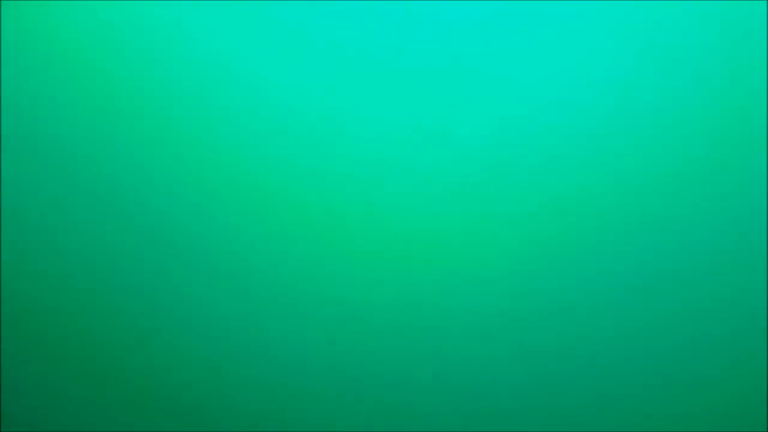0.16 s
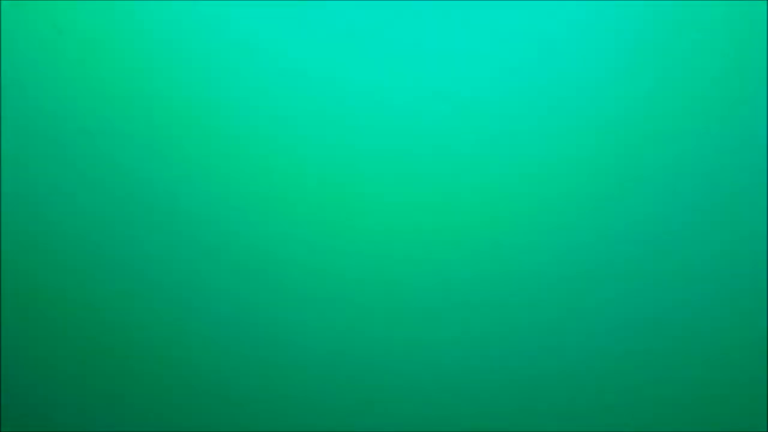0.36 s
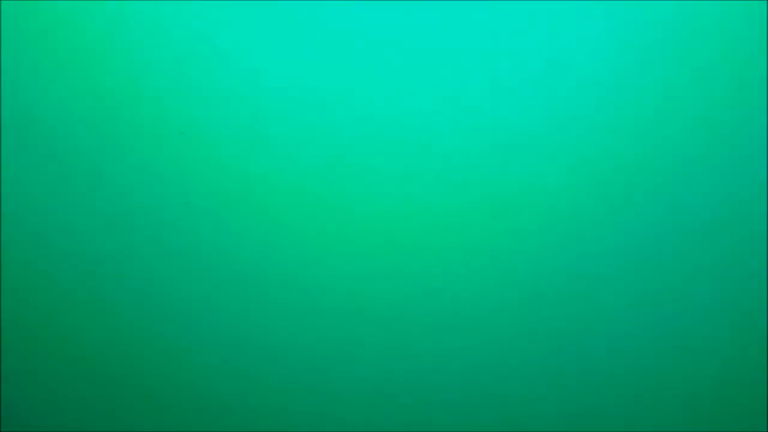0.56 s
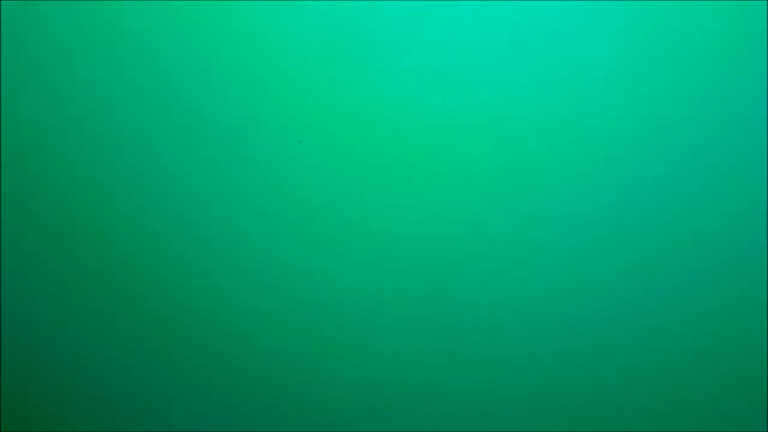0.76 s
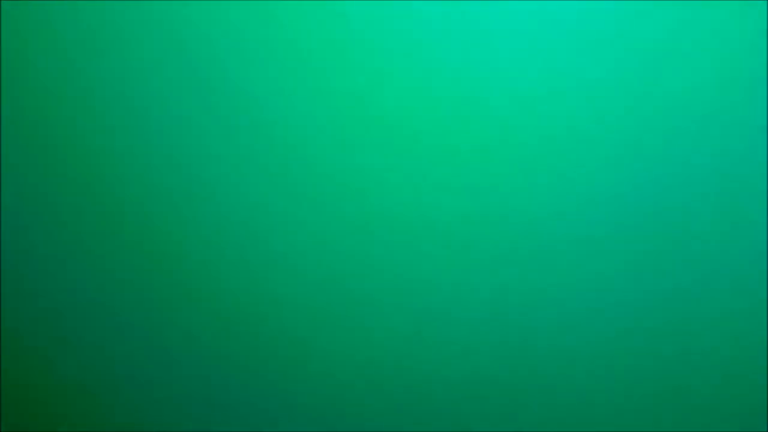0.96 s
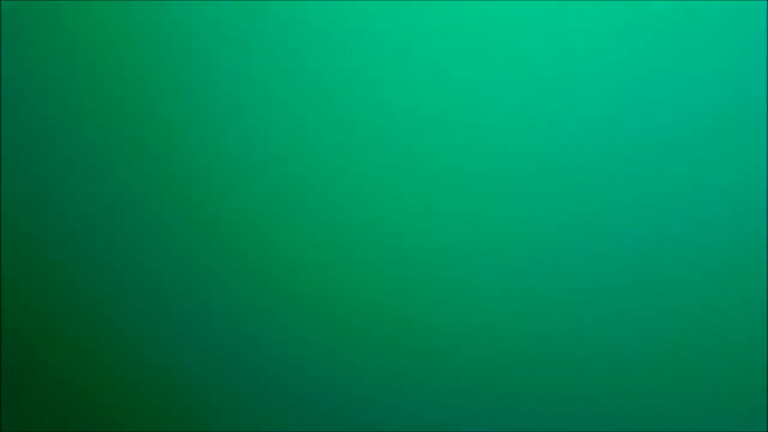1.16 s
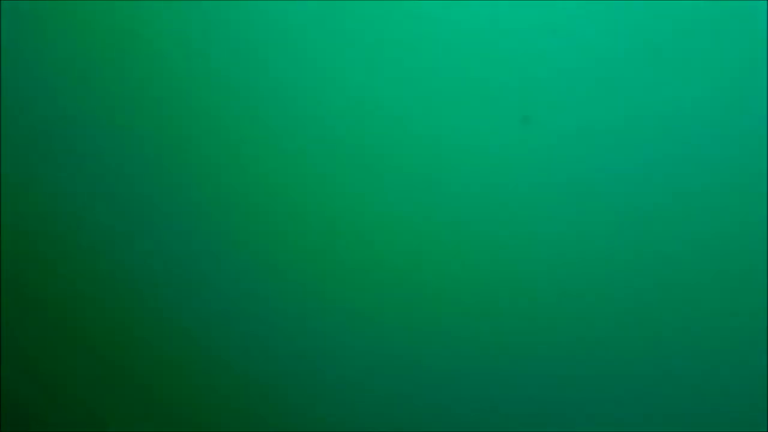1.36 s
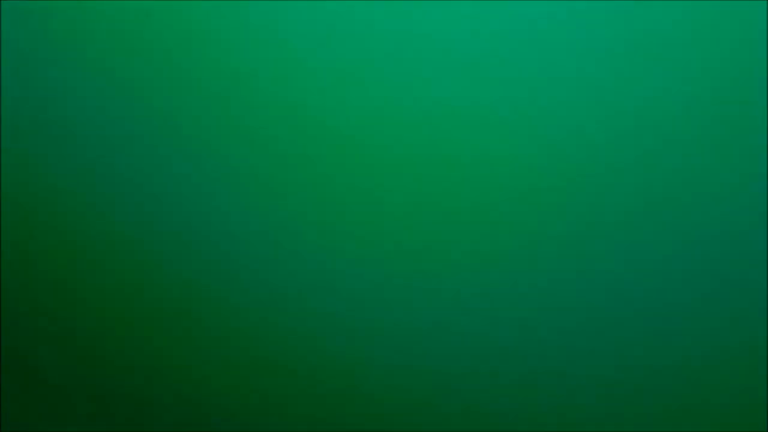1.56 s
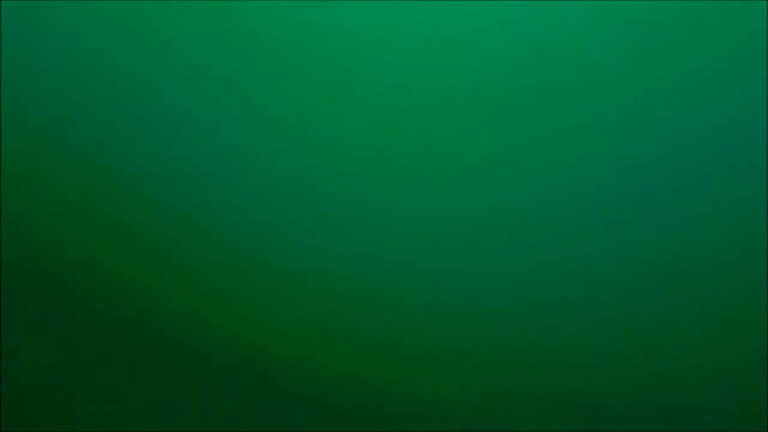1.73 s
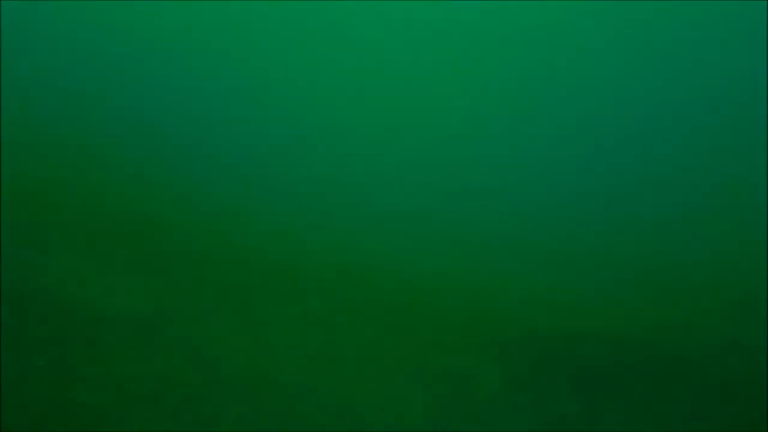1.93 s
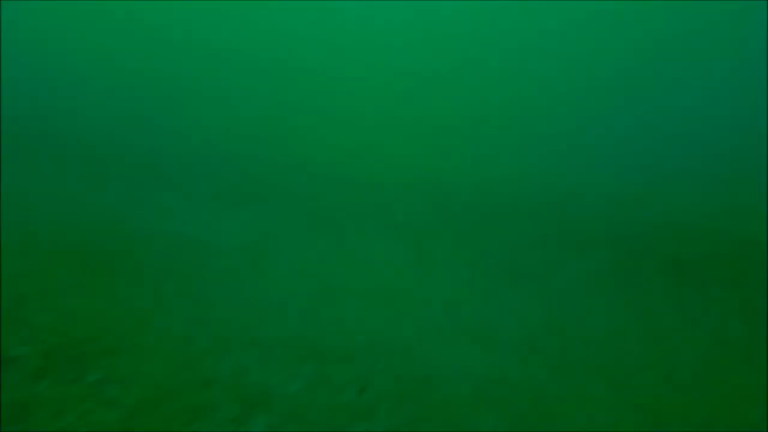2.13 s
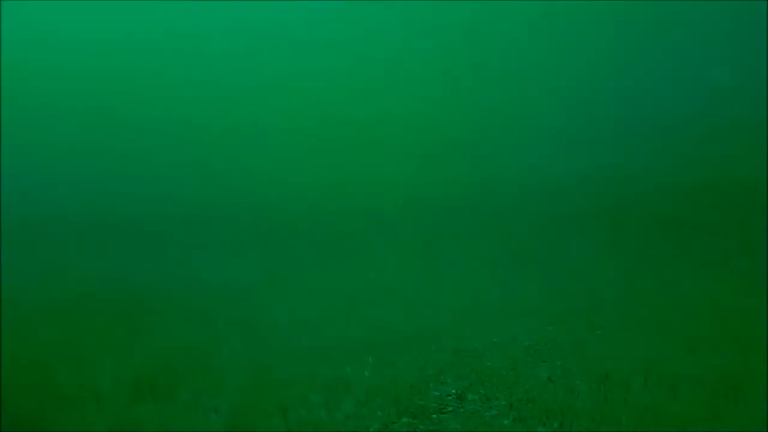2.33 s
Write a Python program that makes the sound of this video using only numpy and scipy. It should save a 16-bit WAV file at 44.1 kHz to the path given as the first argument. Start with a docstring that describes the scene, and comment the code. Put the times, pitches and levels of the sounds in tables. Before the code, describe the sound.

Underwater boat motor drone cuts out, followed by scraping, hard knocks and bubble blips on a housing

```python
"""A boat engine buzzes under water, picked up by a microphone inside a camera housing.
The buzz is a train of clicks and noise puffs over humming partials, and drops away after a second or so.
Then the housing is rubbed (dense small slips and tiny squeaks), knocked (clicks with chatter) and pushed
(low thuds), while bubbles blip as short rising tones. The housing's resonances colour engine, slips and
knocks. Near the end one especially hard knock overloads the recorder."""
import sys
import numpy as np
from scipy import signal
from scipy.fft import rfft, irfft
from scipy.io import wavfile
from scipy.ndimage import uniform_filter1d

SR = 44100
rng = np.random.default_rng(int(sys.argv[2]) if len(sys.argv) > 2 else 0)


def transcribe(u):
    """Save the signal u as a 16-bit wav file named by the first command-line argument.

    u: samples, shape (n,) or (channels, n), limited to [-1, 1]; the rate is SR.
    q: integer samples, one column per channel.
    """
    v = np.clip(np.atleast_2d(u).T, -1, 1)
    q = np.round(v * 32767).astype(np.int16)
    wavfile.write(sys.argv[1], SR, q)


N = 105531
TIME = np.arange(N) / SR  # seconds

# Resonances of the housing around the microphone. Each row: centre in Hz, width in Hz, lift in dB.
HOUSING = [(416.7, 59, 8.5), (525.3, 116, 8.5), (836, 243, 6.5), (947, 262, 10), (1318, 172, -14),
           (1603, 262, 11), (1764, 40, 5), (2638, 306, 21), (3490, 74, 2.5), (3790, 574, 16.5),
           (5000, 320, 8), (5600, 140, 10)]

# Beat rate of the engine; strong and weak beats alternate. Each row: time in seconds, rate in Hz.
BEAT_RATE = [(0.0, 174.3), (0.026, 183), (0.052, 186.5), (0.086, 174.7), (0.17, 172.6), (0.194, 168.4),
             (0.536, 167.3), (0.842, 198.7), (0.984, 198.8), (1.148, 189.3), (1.194, 197.5), (1.25, 195.9)]
# Loudness of the engine's buzz. Each row: time in seconds, level in dB.
BUZZ_LEVEL = [(0, -44), (.05, -41), (.36, -39.5), (.42, -37), (.56, -35.5), (.76, -32.5), (.79, -47.5),
              (.81, -30.5), (.86, -34.5), (.884, -34), (.91, -31.5), (1.12, -35.5), (1.225, -32.5),
              (1.245, -52), (1.33, -46.5), (1.45, -57), (2.39, -69)]
# Level of the engine's hum. Each row: time in seconds, level in dB.
HUM_LEVEL = [(0, -58.5), (.2, -63.5), (.45, -62), (.6, -58.5), (.72, -60), (.9, -57.5), (1.08, -54),
             (1.15, -68.5), (1.235, -59), (1.29, -84.5), (2.39, -89)]
# Partials of the hum. Each row: multiple of the beat rate, level in dB before the resonances.
HUM_PARTIALS = [(1, 0.5), (2, -12), (2.5, -12.5), (3, -9.5), (3.5, -5.5), (4, 1.5), (4.5, -8.5), (5, -9)]
# Single harder beats of the engine. Each row: time in seconds, peak in dB.
HARD_BEATS = [(.426, -19.5), (.493, -23.5), (0.606, -22.5), (.694, -27), (.738, -22), (.8, -20),
              (.851, -21.5), (.89, -26), (1.191, -24)]
# Colour of the engine before the resonances. Each row: frequency in Hz, level in dB.
ENGINE_COLOUR = [(100, -11.5), (300, -19), (450, -15.5), (750, 0.5), (1100, 0.5), (1600, -4), (2600, -18.5),
                 (3800, -24), (5000, -33), (7800, -37)]
# Narrow resonances on the engine's own path. Each row: centre in Hz, width in Hz, lift in dB.
ENGINE_PATH = [(517.3, 51, 9), (773, 25, 8)]
WEAK_BEAT_DB, BEAT_SPREAD_DB, JITTER_S = -8, 2.5, 0.00013
PUFF_S, PUFF_DB, WASH_DB = 0.0022, -17.5, -25.5  # noise after each click, and steady noise, against a strong click
BUZZ_LOW_HZ = 356
HUM_WAVER_DB, HUM_WANDER_RAD = 0.91, 0.11  # unsteadiness of the partials, per multiple

# Background of the water and the recorder. Each row: frequency in Hz, level in dB.
FLOOR_COLOUR = [(15, 20.5), (30, -8), (70, -0.5), (200, -2), (400, -8), (1000, -44), (4000, -16),
                (7800, -19)]
FLOOR_DB = -51.5

# Knocks on the housing. Each row: start in seconds, peak in dB, contact length in seconds,
# frequency in Hz above which the contact is dull, frequency in Hz below which it is thin.
KNOCKS = [(0.418, -29, 0.0056, 3576, 1193), (1.2935, -38, 0.0035, 3000, 1202),
          (1.3612, -20, 0.0019, 6000, 2493), (1.429, -4, 0.0027, 3500, 100), (1.449, -6, 0.0079, 3900, 990),
          (1.4975, -15, 0.0028, 6000, 300), (1.509, -23.5, 0.006, 5030, 60),
          (1.563, -17, 0.0047, 2600, 1220), (1.57, -17.5, 0.0072, 1800, 1514),
          (1.588, -48, 0.0023, 1200, 910), (1.6389, -18.5, 0.0061, 2000, 1500),
          (1.687, -23, 0.0034, 3000, 298.7), (1.693, -25, 0.012, 3000, 196),
          (1.806, -31.5, .004, 3000, 609.6), (2.203, -8, 0.0025, 2900, 400),
          (2.209, -9.5, 0.0097, 2870, 406), (2.229, -20.5, 0.0041, 6000, 300),
          (2.2835, 5, 0.0099, 4060, 54.6), (2.2965, -3, 0.0104, 1590, 1100),
          (2.316, -3.5, 0.0068, 1750, 1290), (2.327, -8.5, 0.0073, 2370, 1580),
          (2.339, -16.5, 0.0069, 1400, 1500)]
# Colour of a knock before the housing. Each row: frequency in Hz, level in dB.
KNOCK_COLOUR = [(40, -4), (250, -19.5), (450, -7.5), (800, -7.5), (1300, 4.5), (1900, 3), (2700, -9),
                (3800, -10), (5000, -13), (6200, -7), (7800, -3)]
# Modes that ring on after a knock. Each row: frequency in Hz, level in dB against the knock's peak,
# time in seconds to die by 60 dB.
RINGS = [(866, -37, .15), (1063, -43.5, 0.19), (1694, -28.5, 0.24), (1680, -27, 0.15), (1660, -25, 0.061),
         (1795, -29, .13), (2410, -24, .1)]
CHATTER_DB = -17  # against the click
CONTACT_RISE, CLICK_AT = 0.088, 0.22  # chatter's rise time and click's moment, as shares of the contact length

# Rubbing on the housing, before flutter and shifts of tone. Each row: time in seconds, level in dB.
RUB_LEVEL = [(1.275, -47.5), (1.295, -43), (1.32, -34), (1.355, -41), (1.364, -32), (1.385, -33),
             (1.405, -22.5), (1.422, -38.5), (1.436, -29.5), (1.448, -32.5), (1.462, -21.5), (1.508, -22.5),
             (1.545, -38.5), (1.585, -42), (1.615, -50.5), (1.66, -43), (1.7, -39), (1.75, -42),
             (1.79, -45), (1.87, -50.5), (1.92, -46), (1.99, -32.5), (2.06, -31.5), (2.12, -27),
             (2.17, -26.5), (2.21, -24.5), (2.245, -35), (2.28, -33), (2.33, -34), (2.39, -43)]
# Colour of the rubbing before the housing. Each row: frequency in Hz, level in dB.
RUB_COLOUR = [(100, -25), (300, -17), (450, -4.5), (800, -1), (1300, 12), (2000, 5.5), (2700, 0),
              (3800, -6.5), (5000, -12.5), (6200, -14.5), (7800, -21.5)]
# Lift of the rubbing's treble. Each row: time in seconds, lift in dB.
RUB_TREBLE = [(1.3, 3), (1.39, 8), (1.5, 2.5), (1.54, -5), (1.75, 2), (1.95, -3), (2.05, 5), (2.16, 13),
              (2.21, -3.5), (2.36, -5)]
# Lift of the rubbing's low range. Each row: time in seconds, lift in dB.
RUB_LOWS = [(1.3, 3.5), (1.37, 2), (1.41, 6), (1.438, 17.5), (1.47, -4.5), (1.51, 1), (1.59, 7), (1.7, 3),
            (1.85, -1), (2.0, 1), (2.12, 0.5), (2.18, -4), (2.23, 7.5), (2.36, 13)]
RUB_TREBLE_HZ, RUB_LOWS_HZ = 3900, 1110
SLIPS_PER_S, SLIP_SPREAD_DB, RUB_FLUTTER_DB = 3300, 1, 1.5

SQUEAKS_PER_S, SQUEAK_CYCLES = 110, 6.5  # tiny squeaks within the rubbing; cycles until each swell peaks
SQUEAK_LOW_HZ, SQUEAK_HIGH_HZ, SQUEAK_TILT_DB = 1990, 5860, -2  # tilt per octave

# Single bubbles. Each row: start in seconds, peak in dB, starting pitch in Hz.
BUBBLES = [(1.364, -22, 2697), (1.485, -29, 2700), (1.498, -19.5, 2870), (1.527, -15.5, 1815),
           (2.096, -21, 2710), (2.119, -20, 2690), (2.179, -10.5, 1534), (2.188, -12, 1520),
           (2.303, -17.5, 1670), (2.369, -22.5, 1584)]
BUBBLE_SWELL_S = 0.0034
PITCH_RISE_PER_S = 3  # of bubbles and squeaks, as a share of the starting pitch

# Low thuds as the housing is pushed. Each row: centre in seconds, level in dB, length in seconds.
THUDS = [(1.53, -49, 0.03), (2.269, -44, 0.018), (2.34, -42.5, 0.032)]
THUD_HZ = 50

INPUT_BAND_HZ, CUTOFF_HZ = 7900, 14800


def from_db(db):
    """Decibels to gain."""
    return 10 ** (np.asarray(db) / 20)


def rms_one(x):
    """Scale to unit rms."""
    return x / np.sqrt(np.mean(x ** 2) + 1e-20)


def in_time(rows):
    """A control curve at every sample."""
    return np.interp(TIME, *np.transpose(rows))


def drift(rate):
    """Slow random wander with spread 1, up to a rate in Hz."""
    low_pass = signal.butter(2, rate, fs=SR, output="sos")
    # the first half lets the filter settle
    return rms_one(signal.sosfilt(low_pass, rng.standard_normal(2 * N))[N:])


def lift_db(hz, resonances):
    """How much a set of resonances lifts these frequencies."""
    return sum(lift / (1 + (2 * (hz - centre) / width) ** 2) for centre, width, lift in resonances)


def response(colour, resonances=(), size=131072):
    """Causal (minimum-phase) frequency response of a colour with resonances on top."""
    hz = np.arange(size // 2 + 1) * SR / size
    points = np.array(colour)
    db = np.interp(np.log(hz + 1), np.log(points[:, 0]), points[:, 1]) + lift_db(hz, resonances)
    # folding the cepstrum forward in time makes the response causal
    cepstrum = irfft(np.log(from_db(db)))
    cepstrum[1:size // 2] *= 2
    cepstrum[size // 2 + 1:] = 0
    return np.exp(rfft(cepstrum))


def filtered(x, gains):
    """Pass a sound through a frequency response."""
    return irfft(rfft(x, 2 * (len(gains) - 1)) * gains)[:N]


def engine_buzz(cycles, path):
    """Strong and weak beats alternate, each a click with a dying puff of noise, over a steady wash."""
    beats = np.flatnonzero(np.diff(np.floor(cycles)))
    timing, strength = rng.standard_normal((2, len(beats)))
    at = np.clip(beats + (JITTER_S * SR * timing).astype(int), 0, N - 1)
    weak = np.arange(len(beats)) % 2
    clicks = np.zeros(N)
    clicks[at] = from_db(WEAK_BEAT_DB * weak + BEAT_SPREAD_DB * np.minimum(strength, 1))
    puffs = signal.lfilter([1], [1, -np.exp(-1 / (PUFF_S * SR))], clicks)
    noise_level = from_db(PUFF_DB) * puffs + from_db(WASH_DB)
    drive = clicks + noise_level * rng.standard_normal(N)
    high_pass = signal.butter(6, BUZZ_LOW_HZ, "high", fs=SR, output="sos")
    buzz = filtered(signal.sosfilt(high_pass, drive), path)
    # even out the loudness so that the level curve sets it
    buzz = buzz / np.sqrt(uniform_filter1d(buzz ** 2, size=3000))
    return from_db(in_time(BUZZ_LEVEL)) * buzz


def hard_beats(path):
    """Single sharp impulses sound through the engine's path."""
    impulses = np.zeros(N)
    impulse_peak = np.abs(irfft(path)).max()
    for start, db in HARD_BEATS:
        impulses[int(start * SR)] = from_db(db) / impulse_peak
    return filtered(impulses, path)


def engine_hum(rate, cycles):
    """Unsteady sine partials follow the beat rate, louder as they slide through resonances."""
    hum = 0
    for multiple, db in HUM_PARTIALS:
        waver = HUM_WAVER_DB * multiple * drift(16)
        level = from_db(db + lift_db(multiple * rate, HOUSING + ENGINE_PATH) + waver)
        wander = HUM_WANDER_RAD * multiple * drift(5)
        hum = hum + level * np.sqrt(2) * np.sin(2 * np.pi * multiple * cycles + wander)
    return from_db(in_time(HUM_LEVEL)) * hum


def engine():
    """Buzz, harder beats and hum share one engine; buzz and hum share its changing beat rate."""
    rate = in_time(BEAT_RATE)
    cycles = np.cumsum(rate) / SR
    path = response(ENGINE_COLOUR, HOUSING + ENGINE_PATH)
    return engine_buzz(cycles, path) + hard_beats(path) + engine_hum(rate, cycles)


def background():
    """Steady coloured noise stands for the water and the recorder."""
    return from_db(FLOOR_DB) * rms_one(filtered(rng.standard_normal(N), response(FLOOR_COLOUR)))


def knocks(size=16384):
    """Each knock is a click and milliseconds of chatter into the housing, which rings on faintly."""
    body = irfft(response(KNOCK_COLOUR, HOUSING))[:size]
    out, t = np.zeros(N + size), TIME[:size]
    for start, db, contact_s, dull_hz, thin_hz in KNOCKS:
        swell = 1 - np.exp(-t / (CONTACT_RISE * contact_s))
        contact = swell * np.exp(-(t / contact_s) ** 4)
        force = from_db(CHATTER_DB) * rng.standard_normal(size) * contact
        force[int(CLICK_AT * contact_s * SR)] += 1
        force = signal.sosfilt(signal.butter(2, dull_hz, fs=SR, output="sos"), force)
        force = signal.sosfilt(signal.butter(1, thin_hz, "high", fs=SR, output="sos"), force)
        knock = signal.fftconvolve(force, body)[:size]
        ring = 0
        for hz, level, t60 in RINGS:
            ring = ring + from_db(level - 60 * t / t60) * np.sin(2 * np.pi * (hz * t + rng.random()))
        out[int(start * SR):][:size] += from_db(db) * (knock / np.abs(knock).max() + swell * ring)
    return out[:N]


def rubbing():
    """Dense little slips excite the housing; treble and lows shift as the rubbing goes on."""
    happens = rng.random(N) < SLIPS_PER_S / SR
    strength = from_db(SLIP_SPREAD_DB * np.minimum(rng.exponential(1, N), 4))
    slips = happens * rng.choice([-1, 1], N) * strength
    rub = filtered(slips, response(RUB_COLOUR, HOUSING))
    # even out the loudness before the level curve
    rub = rub / np.sqrt(uniform_filter1d(rub ** 2, size=1500))
    treble = signal.sosfiltfilt(signal.butter(4, RUB_TREBLE_HZ, "high", fs=SR, output="sos"), rub)
    lows = signal.sosfiltfilt(signal.butter(4, RUB_LOWS_HZ, fs=SR, output="sos"), rub)
    rub = rub + (from_db(in_time(RUB_TREBLE)) - 1) * treble
    rub = rub + (from_db(in_time(RUB_LOWS)) - 1) * lows
    return rub * from_db(in_time(RUB_LEVEL) + RUB_FLUTTER_DB * drift(70))


def rising_tone(hz, t):
    """A sine whose pitch climbs steadily from hz."""
    return np.sin(2 * np.pi * hz * t * (1 + PITCH_RISE_PER_S * t / 2))


def squeaks(size=2048):
    """Tiny squeaks within the rubbing: short rising tones of random moment and pitch that follow its level."""
    out, t, level = np.zeros(N + size), TIME[:size], in_time(RUB_LEVEL)
    for when, pitch, strength in rng.random((int(SQUEAKS_PER_S * N / SR), 3)):
        at = int(when * N)
        hz = SQUEAK_LOW_HZ * (SQUEAK_HIGH_HZ / SQUEAK_LOW_HZ) ** pitch
        age = t * hz / SQUEAK_CYCLES
        gain = strength * from_db(level[at] + SQUEAK_TILT_DB * np.log2(hz / SQUEAK_LOW_HZ))
        out[at:at + size] += gain * age * np.exp(1 - age) * rising_tone(hz, t)
    return out[:N]


def bubbles():
    """Short blips that swell, die and rise a little in pitch."""
    out = np.zeros(N)
    for start, db, hz in BUBBLES:
        t = np.maximum(TIME - start, 0)
        swell = (t / BUBBLE_SWELL_S * np.exp(1 - t / BUBBLE_SWELL_S)) ** 2
        out += from_db(db) * swell * rising_tone(hz, t)
    return out


def thuds():
    """Pushing the housing makes brief swells of low-passed noise."""
    low_pass = signal.butter(2, THUD_HZ, fs=SR, output="sos")
    rumble = rms_one(signal.sosfilt(low_pass, rng.standard_normal(N)))
    return rumble * sum(from_db(db) * np.exp(-((TIME - centre) / length) ** 2) for centre, db, length in THUDS)


def scene():
    """Engine, handling and bubbles over a faint background, in one channel."""
    handling = knocks() + rubbing() + squeaks() + thuds()
    return (engine() + background() + handling + bubbles())[None]


def record(dry):
    """A narrow-band input saturates towards full scale; a later low-pass trims the top of the distortion."""
    input_band = signal.ellip(10, 0.2, 80, INPUT_BAND_HZ, fs=SR, output="sos")
    narrow = signal.sosfilt(input_band, dry)
    clipped = narrow / (1 + narrow ** 8) ** (1 / 8)
    return signal.sosfilt(signal.cheby2(12, 70, CUTOFF_HZ, fs=SR, output="sos"), clipped)


dry = scene()
out = record(dry)
transcribe(out)
```